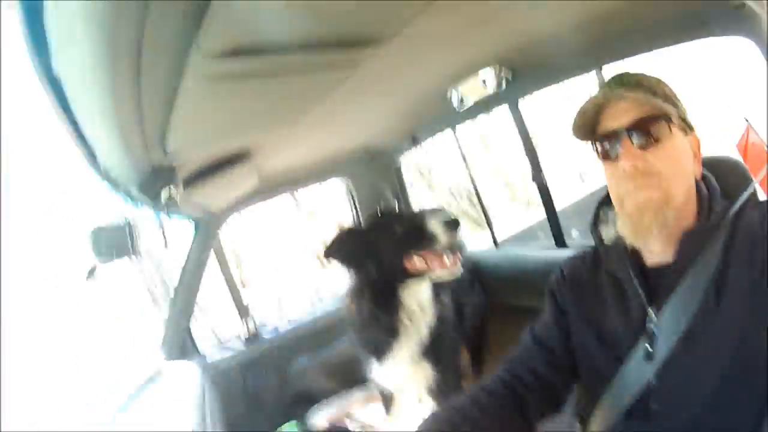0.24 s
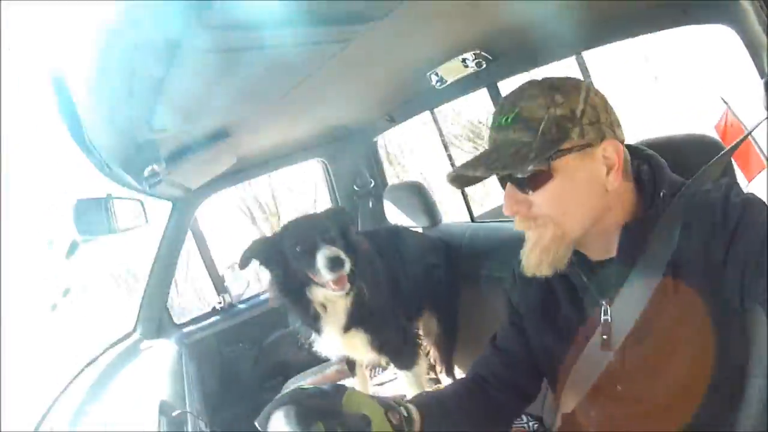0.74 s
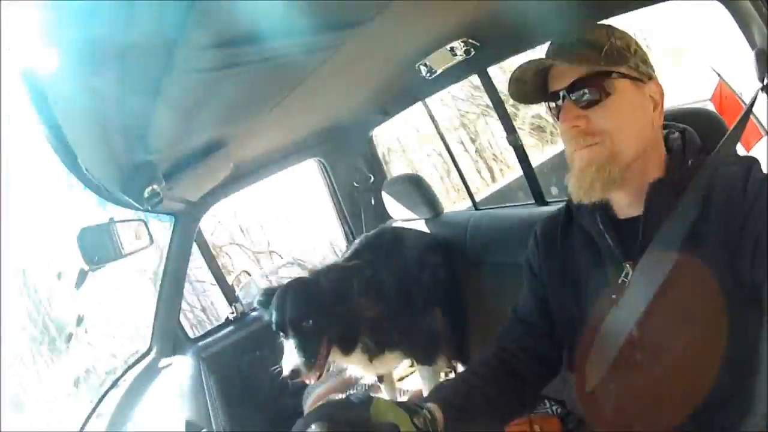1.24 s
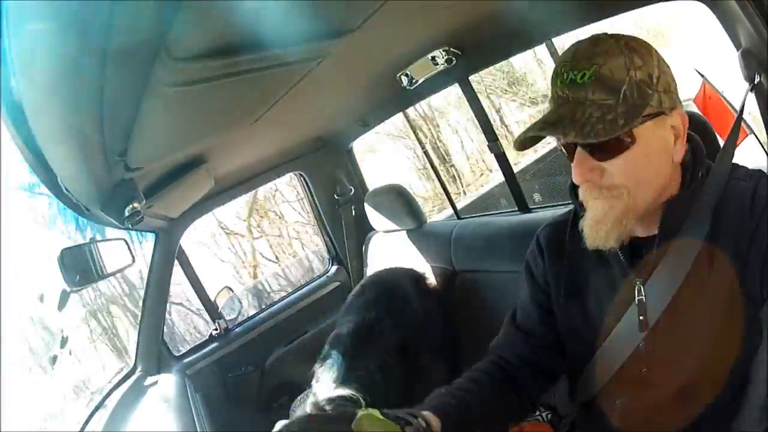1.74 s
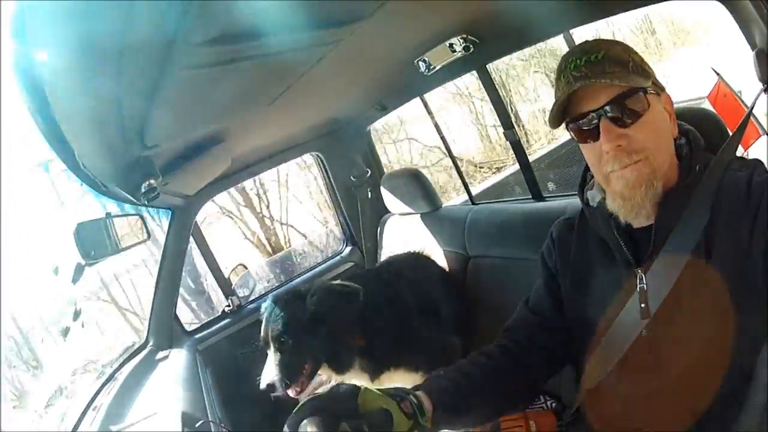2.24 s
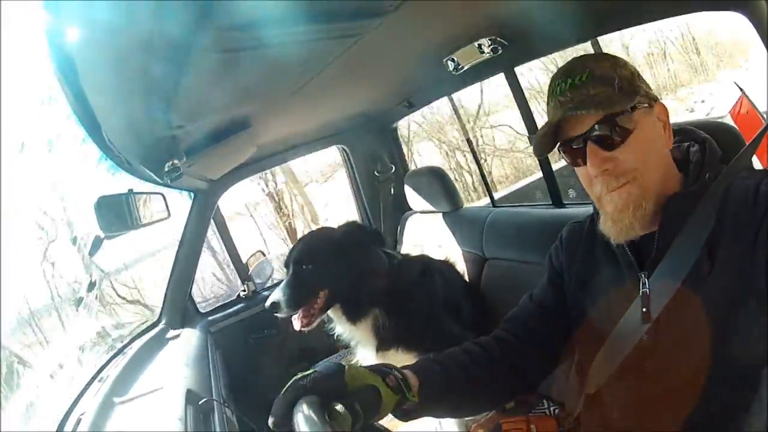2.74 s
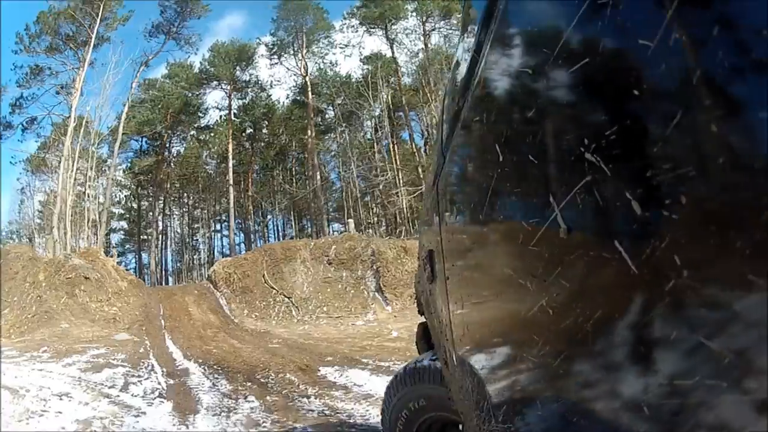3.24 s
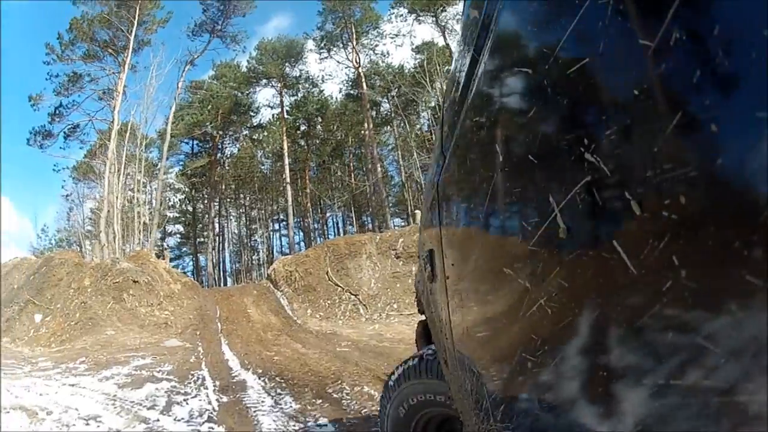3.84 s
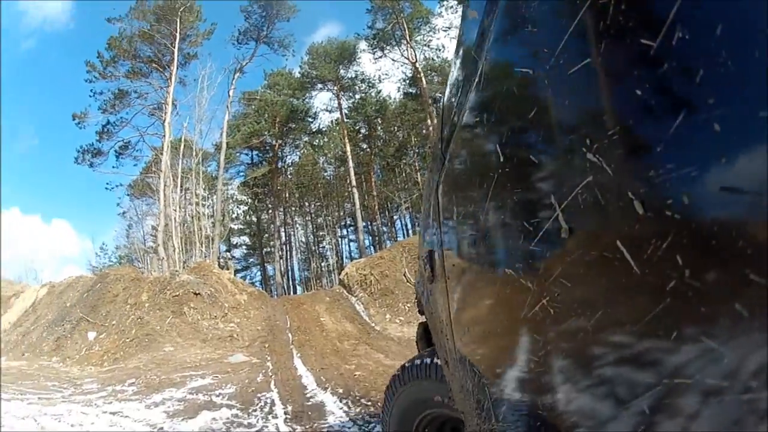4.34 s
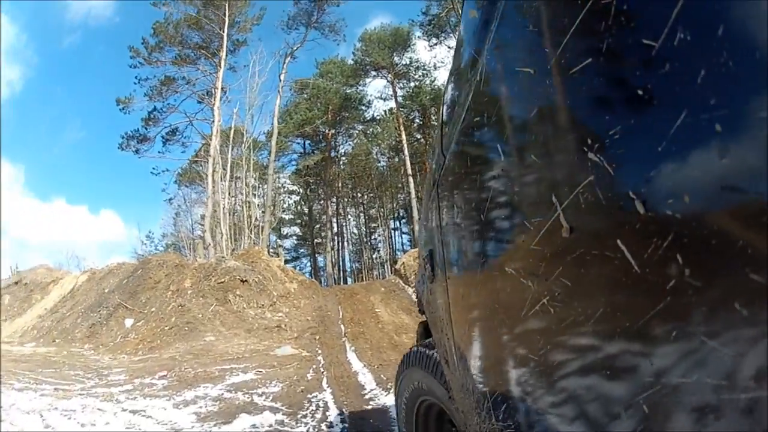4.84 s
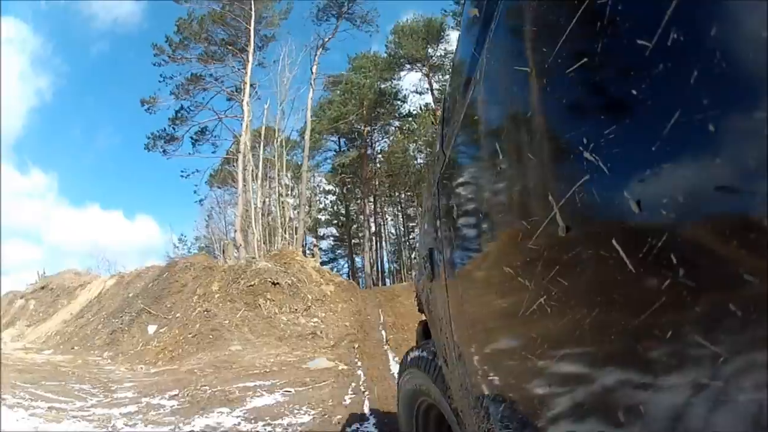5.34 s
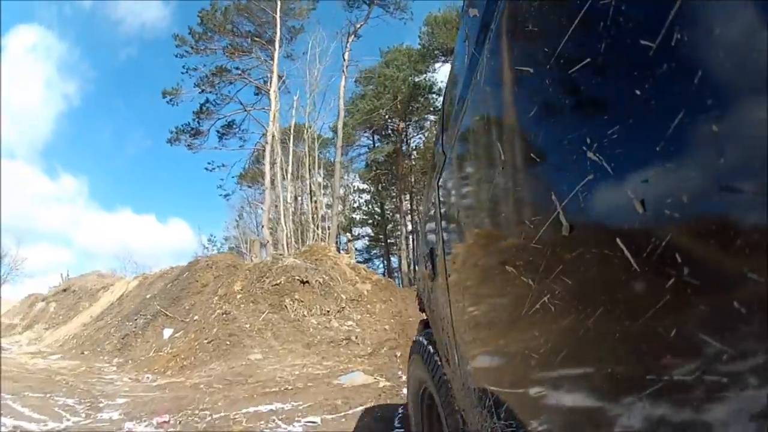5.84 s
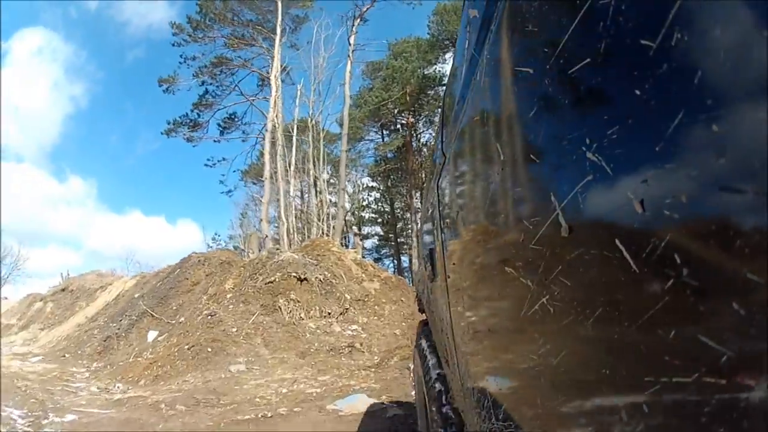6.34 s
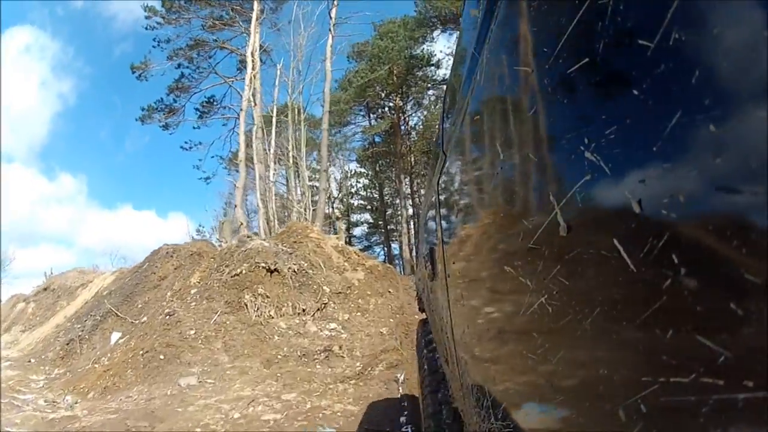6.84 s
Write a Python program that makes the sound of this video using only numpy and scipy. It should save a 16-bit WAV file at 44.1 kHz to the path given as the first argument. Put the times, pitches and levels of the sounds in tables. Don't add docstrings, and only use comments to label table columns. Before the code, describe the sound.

Loud close plastic clacks and thumps on a jolting truck for three seconds, then soft tyre rush, twig scratches and a muffled revving engine.

```python
import sys
import numpy as np
from scipy import signal
from scipy.fft import rfft, irfft, next_fast_len
from scipy.io import wavfile
from scipy.ndimage import map_coordinates

SR = 44100
rng = np.random.default_rng(int(sys.argv[2]) if len(sys.argv) > 2 else 0)


def transcribe(u):
    v = np.clip(np.atleast_2d(u).T, -1, 1)
    q = np.round(v * 32767).astype(np.int16)
    wavfile.write(sys.argv[1], SR, q)


def volts(x):
    e = np.asarray(x, float) / 20
    return 10 ** e


N = 313551

# time in seconds, jolting of the cab in dB, engine drone in the body in dB.
RIDE = [(0.0, -40, -66), (0.15, -55, -33.5), (0.55, -37, -45), (0.8, -37, -77), (1.1, -46.5, -47),
        (1.44, -38, -65.5), (1.52, -38.5, -55.5), (1.6, -47, -65), (1.75, -37, -59), (2.3, -44.5, -56),
        (2.75, -48, -67.5), (3.0, -47.5, -48), (3.17, -30, -45), (3.3, -49, -46.5), (3.82, -42, -44),
        (4.39, -52.5, -50), (4.6, -59, -55.5), (5.05, -60.5, -45.5), (5.86, -83, -47.5), (6.26, -67, -52.5),
        (7.11, -63, -42)]
# resonance in Hz, width in Hz, level in dB.
CAB_AIR = [(42.05, 42.6, -1.5), (28.56, 12, -3.5), (20, 16, -10)]
# resonance in Hz, width in Hz, level in dB.
PANELS = [(65.6, 14, -2), (98, 10.7, 0), (126.5, 14.4, 1.5), (142.8, 64, -6)]
# resonance in Hz, width in Hz, level in dB.
DOOR = [(221, 20, 0)]
# resonance in Hz, width in Hz, level in dB.
ROOF = [(118, 9, 0)]
PANEL_JOLT_DB, PANEL_DRONE_DB, DOOR_DB, ROOF_DB = -10.5, 0, -11.5, -18
DOOR_FROM_S = 2.965
# peak in seconds, rise in seconds, fall in seconds, level in dB.
ROOF_SWELLS = [(0.79, 0.15, 0.24, -38), (1.09, 0.023, 0.16, -29.5), (2.47, 0.52, 0.56, -64.5),
               (3.3, 0.39, 1.1, -43.5), (4.28, 0.094, 0.32, -41.5), (4.46, 0.39, 0.12, -54.5),
               (3.72, 0.54, 0.31, -55), (5.3, 0.2, 0.3, -52), (6.71, 1, 1, -55.5)]
# peak in seconds, rise in seconds, fall in seconds, level in dB.
DOOR_SWELLS = [(3.02, 0.058, 0.22, -49), (3.6, .5, 0.35, -55), (4.3, .3, 0.31, -53),
               (5.15, .4, 0.63, -51.5), (5.78, 0.23, 0.44, -49), (6.85, 0.61, 0.41, -54.5)]
ROOF_HUM_HZ, DOOR_HUM_HZ = 120.6, 223

# time in seconds, firing rate in Hz, level in dB.
ENGINE = [(4.7, 60.37, -51), (4.82, 64.16, -45), (5.0, 86.7, -47), (5.12, 107, -41), (5.3, 107.1, -51.5),
          (5.5, 92.96, -45), (5.7, 79.7, -48.5), (5.85, 70.8, -47), (6.05, 69.8, -53), (6.4, 57.1, -62.5),
          (6.62, 62.5, -55), (6.85, 74.1, -45), (7.0, 89.4, -48), (7.11, 98, -45)]
# time in seconds, whine in Hz, level in dB.
GEAR_WHINE = [
    (6.7, 1658, -85),
    (6.82, 1660, -60),
    (7.0, 2000, -51),
    (7.11, 2000, -63),
]
# resonance in Hz, width in Hz, level in dB.
FLOOR_PAN = [(322, 36, -6)]

# time in seconds, level in dB.
TYRES = [(2.965, -51.5), (3.2, -54.5), (3.48, -55), (4.05, -52.5), (4.53, -62.5), (4.75, -60.5),
         (4.93, -54), (4.96, -52), (5.16, -47.5), (5.45, -53), (5.82, -54.5), (6.05, -58.5), (6.34, -58),
         (6.73, -55.5), (6.91, -52.5), (7.11, -50.5)]
# resonance in Hz, width in Hz, level in dB.
ROAD = [(662, 167, -0.5), (276.3, 45, 1.5), (860, 410, -42.5), (1250, 168, 1.5), (1817, 78, 8),
        (2255, 114, 5.5), (3070, 220, 0), (3360, 780, -9.5), (4850, 370, -16), (5550, 300, -13.5)]
# peak in seconds, rise in seconds, fall in seconds, level in dB.
SEAL_HISS = [
    (2.975, .02, .05, -56),
    (4.86, 0.12, 0.5, -63),
    (5.16, 0.61, 0.61, -71),
    (6.98, .6, .6, -64),
]
# resonance in Hz, width in Hz, level in dB.
SEAL = [(5560, 160, 0)]

# time in seconds, level in dB, pitch in Hz.
AXLE_BUMPS = [(1.777, -24.5, 90), (2.394, -29, 80), (1.47, -25, 110), (1.432, -28, 60), (3.21, -30, 70),
              (1.225, -37, 125)]
# peak in seconds, rise in seconds, fall in seconds, level in dB.
TWIGS = [
    (4.716, 0.0027, 0.038, -39.5),
    (4.764, 0.0029, 0.065, -32),
    (4.795, 0.021, 0.035, -44),
    (4.82, 0.036, 0.018, -42),
    (4.946, 0.009, 0.1, -39.5),
]
# resonance in Hz, width in Hz, level in dB.
DOOR_SKIN = [(1750, 94, 4.5), (2350, 320, 0.5), (3270, 440, -1), (5000, 870, -12)]
# time in seconds, level in
# dB, pitch in Hz, width in Hz.
TAPS = [(1.696, -47, 3300, 1500), (1.768, -52, 4600, 900), (1.795, -54, 3200, 1200),
        (2.261, -47, 3200, 500), (2.732, -49, 3400, 800), (2.78, -44.5, 2230, 270), (2.686, -47, 2500, 300),
        (2.455, -43, 2200, 299), (4.39, -54, 2750, 500), (4.392, -52, 1700, 500), (4.41, -65, 2600, 520),
        (4.72, -53, 3900, 500), (4.765, -46, 1200, 300), (4.79, -53, 4600, 900), (4.949, -45, 1100, 400),
        (1.082, -33, 3970, 2500), (1.809, -22, 470, 300), (2.024, -17.5, 464, 300), (2.31, -20.5, 450, 340),
        (2.311, -16, 1800, 400), (0.48, -46.5, 4000, 2500), (0.585, -48, 3000, 2500),
        (3.163, -20, 1700, 900), (3.227, -53, 5700, 1500), (3, -47, 3400, 360), (2.025, -18, 1600, 700),
        (2.151, -18, 1700, 800), (1.81, -22, 1800, 900), (4.946, -44, 3500, 500), (0.762, -22, 550, 300),
        (2.312, -22, 550, 200)]
TAP_MS = 2.8

# time in seconds, truck body in dB, lid ring in dB.
THUMPS = [(0.144, -10, -22), (0.2052, -24, -27), (0.312, -11.5, -19), (0.4185, -18, -24.5),
          (0.5336, -8.5, -24.5), (0.6677, -27.5, -24.5), (0.7191, -11, -19.5), (0.7616, -33, -24.5),
          (1.0698, -11.5, -20.5), (1.2993, -8, -19), (1.3872, -29.5, -33), (1.4075, -18.5, -28),
          (1.4526, -59, -28.5), (1.77, -45, -70), (1.807, -23, -20), (2.023, -20.5, -28),
          (2.1486, -23, -29), (2.3105, -19, -30.5), (2.39, -55, -67), (2.425, -35, -23.5),
          (3.1386, -14, -28.5), (3.1607, -45, -32), (0.0, -28.5, -33.5)]
# resonance in Hz, width in Hz, level in dB.
THUD = [(46, 26, 18.5), (65.5, 91, 19.5), (111.1, 2.7, 14), (137, 180, 5.5)]
# note in Hz, width in Hz.
LID_NOTES = [(656, 19), (666, 26), (650, 49), (650, 22), (669, 37), (637, 51), (657, 36), (633, 27),
             (657, 21), (650, 20), (617, 18), (630, 22), (629, 18.7), (635, 17), (633, 33), (635, 11),
             (635, 14), (630, 17), (635, 17), (657, 17), (640, 27), (660, 22), (640, 14.5)]
# resonance in Hz, width in Hz, level in dB.
LID_UPPER = [(735, 30, -20)]
# time in seconds, level in dB.
BOTTOMS = [(1.3004, -12), (1.8088, -20.5), (2.025, -15), (2.15, -18.5), (2.3104, -21.5)]
# resonance in Hz, width in Hz, level in dB.
STEM = [(313, 140, 0)]

# peak in seconds, rise in seconds, fall in seconds, level in dB, pitch in Hz.
SQUEAKS = [(0.122, 0.0089, 0.011, -31, 1880), (0.132, 0.014, 0.0048, -22, 2106),
           (0.471, .008, .008, -25, 1900), (0.4832, 0.01, 0.0026, -13.5, 1860),
           (0.4903, 0.0052, 0.0036, -15, 2000), (0.495, 0.0055, 0.004, -13, 1884),
           (0.5055, 0.0075, 0.003, -1.5, 1850), (0.514, 0.0085, 0.0025, -13, 1870),
           (0.525, 0.019, 0.0077, -17, 1680), (0.941, 0.0075, 0.0053, -19.5, 1250),
           (1.167, 0.0068, 0.014, -29, 1820), (1.183, 0.0051, 0.0038, -20.5, 1330),
           (1.19, 0.0046, 0.013, -20.5, 1330), (2.203, 0.0072, 0.0043, -30, 1950),
           (3, 0.011, 0.018, -27.5, 1776)]
SQUEAK_WIDTH_HZ = 150

# peak in seconds,
# rise in seconds, fall in seconds, shell in dB, cavity over shell in dB.
SCRAPES = [(0.004, 0.034, 0.0097, -36, 12), (0.115, 0.13, 0.33, -39, 1), (0.309, 0.03, 0.16, -38.5, 2.5),
           (0.41, 0.0063, 0.02, -30.5, -18), (0.474, 0.017, 0.54, -53, 2), (0.528, 0.12, 0.01, -30.5, 5),
           (0.624, 0.031, 0.28, -41.5, 3), (0.79, 0.034, 0.12, -49.5, 2), (0.958, 0.03, 0.055, -31, -6.5),
           (1.191, 0.16, 0.11, -35, -2.5), (1.297, 0.062, 0.07, -42.5, -5),
           (1.487, 0.081, 0.062, -38.5, -11), (1.57, 0.17, 0.034, -43.5, 2.5),
           (1.748, 0.1, 0.042, -41.5, 6), (1.826, 0.056, 0.21, -52.5, 3.5), (2.06, 0.089, 0.21, -58, -6),
           (2.201, 0.039, 0.042, -39.5, 6), (2.345, 0.033, 0.028, -51, -8), (2.377, 0.075, 0.0058, -49, 3),
           (2.454, 0.073, 0.65, -55, -9), (2.57, 0.32, 0.0089, -48.5, 0), (2.684, 0.083, 0.43, -53.5, 3),
           (3.003, 0.032, 0.27, -48, 8.5), (3.121, 0.077, 0.1, -43, -11), (3.19, 0.093, 0.031, -47.5, 8.5),
           (3.87, 0.037, 0.25, -66.5, 16), (4.265, 0.043, 0.072, -57.5, 10), (4.5, 0.17, 0.18, -66.5, 6),
          (4.58, 0.0071, 0.04, -59.5, 10.5), (4.73, 0.045, 0.33, -61.5, 12),
          (1.05, 0.028, 0.031, -50.5, -7), (2.45, 0.031, 0.039, -53, -17)]
# resonance in Hz, width in Hz, level in dB.
HOLLOW = [(343, 350, -15), (670, 33, 6), (800, 148, -5), (1058, 21, 6)]
# resonance in Hz, width in Hz, level in dB.
RUB_BRIGHT = [(4400, 700, -11)]
# centre in Hz, width in Hz, level in dB.
RUB_AIR = [(2850, 500, 0), (5200, 1500, 0)]
RUB_TOP_HZ, RUB_AIR_DB, AIR_GROWS = 5030, -4, 1.3
SCRAPE_CLICK_DB, CLICK_GROWS = 2, 1.245
WANDER_DB = 3

# resonance in Hz, width in Hz, level in dB.
SHELL = [(1221, 120, -1), (1827, 393, 5.5), (2000, 446, 8), (2276, 369, -0.5)]
# resonance in Hz, width in Hz, level in dB.
CLICK = [(2900, 640, -23), (3506, 285, 0), (4157, 240, -6.5), (4700, 430, -15.5)]
# multiple of the blow's cavity pitch, width as a share of it, level in dB.
CAVITY = [(0.45, 0.46, -9.5), (1.029, 0.24, 8)]
# centre in Hz, width in Hz, level in dB.
CRACK = [(1500, 1510, 1), (2920, 2500, -5)]
CRACK_DB, CRACK_CAVITY = -18.5, 0.42
# resonance in Hz, width in Hz, level in dB.
LENS_RING = [(5230, 1100, 0)]
LENS_RING_DB = -12
# time in seconds, shell in dB, cavity over shell in dB, cavity pitch in Hz, click over shell in dB.
BLOWS = [(0.145, -8.5, 3.5, 860, -42.5), (0.2052, -8.5, -15, 736, -20), (0.3127, -7.5, 13.5, 1040, -8),
         (0.3253, -18.5, 3.5, 804, -19.5), (0.3447, -33.5, 12, 860, -3.5), (0.4191, -22.5, 2.5, 700, -11.5),
         (0.5331, 2.5, -7, 925, -19.5), (0.6672, 1.5, -22.5, 1046, -19), (0.7195, -12, 2, 814, -19.5),
         (0.762, -7, -9.5, 860, -14.5), (1.069, -10, 2, 770, -14.5), (1.2978, 2, -10.5, 613, -3),
         (1.32, -18, -5.5, 775, -14), (1.3884, -13, -5, 695, -6), (1.4081, -8.5, -7.5, 1030, -18.5),
         (1.452, -12.5, -4, 626, -4.5), (1.7095, -37, 30, 760, 6.5), (1.808, -15.5, 5, 800, -2),
         (2.0244, -15.5, 10, 795, -1), (2.1503, -13, 5, 714, -3.5), (2.3101, -16, 14.5, 908, 2.5),
         (2.424, -19, 2.5, 740, -8), (3.139, -5, -8.5, 740, -20), (3.162, -9.5, -17.5, 800, -18.5)]
BLOW_MS, SOFTER_LONGER = 1, 0.24
# flank in Hz, flank in dB, shell in Hz, click in Hz.
SPOTS = [(1054, 8, 1820, 1800), (1330, -6, 2000, 3430), (1520, -0.5, 1800, 3300), (1330, 1, 1900, 2700),
         (1280, 4, 2700, 6100), (1320, 12, 2000, 3900), (1060, -6, 1700, 5600), (1340, -1.5, 1900, 1100),
         (1040, 15.5, 1970, 3100), (1400, 2, 1840, 3500), (1030, -2, 1860, 3430), (1100, -1, 1900, 2100),
         (1270, 2, 1950, 3800), (1490, 0.5, 1500, 3500), (1330, 4.5, 1930, 7700), (1450, 1.5, 1760, 3660),
         (1100, -11, 1000, 3360), (1000, -1, 1630, 3800), (1010, -3, 1400, 3850), (1020, 6.5, 1800, 3850),
         (1000, -9, 3800, 3750), (1090, 3, 1580, 4000), (1500, -9, 1900, 6500), (1330, 0, 1900, 3900)]
# flank in Hz, flank in dB, shell in Hz, click in Hz.
USUAL_SPOT = (1284, -1, 1900, 3427)
# time in seconds, shell in dB, click over shell in dB, contact in milliseconds.
RAPS = [(0.0088, -21.5, -21, 1.2), (0.056, -27, -33, 0.48), (0.23, -28.5, -37, 0.35),
        (0.3694, -15.5, -21, 1.7), (0.4362, -26.5, -8, 1.4), (0.469, -32, -1.5, 1.9),
        (0.479, -33.5, 6.5, 2.7), (0.488, -21.5, -1.5, 7.2), (0.5015, -17, -11.5, 1.8), (0.52, -35, 5, 2.5),
        (0.9218, -19, -3.5, 0.34), (0.936, -35, 5.5, 2.8), (0.951, -19, -9.5, 1.8), (1.1096, -32.5, -2, 1),
        (1.2058, -30.5, -13, 1.5), (1.279, -26, -6, 0.34), (1.4438, -26.5, -3.5, 0.37),
        (1.5569, -33, -3, 6.9), (1.5666, -28, -1.5, 1.7), (1.8912, -36.5, -17, 1.8),
        (3.0415, -21, -14, 1.8), (3.205, -29.5, -26, 1.3), (3.864, -43, -30, 11), (4.577, -58, -40, 2.5),
        (4.7145, -46.5, -2.5, 5.9), (5.143, -36, -5, 1.8)]
RAP_CAVITY_DB, RAP_CAVITY_HZ = -19.5, 1100
# time in seconds, shell in dB, cavity over shell in dB.
TICKS = [(0.173, -37, 3), (0.554, -43, -15), (0.6268, -43, 5), (0.655, -43, 14), (0.6777, -32.5, 10),
         (0.746, -36, -22), (0.795, -42.5, -5), (1.3416, -39.5, 7.5), (1.4285, -39, -11),
         (1.4753, -32.5, -14.5), (1.7402, -46, 10), (2.0085, -31.5, -17.5), (1.6935, -52.5, -11),
         (2.05, -42, 4), (2.0822, -56, 14), (2.2003, -46, 18), (2.21, -31.5, -2), (2.22, -34, 2),
         (2.261, -42.5, -10), (2.593, -50.5, -16), (2.668, -35.5, -29), (2.677, -37, -30),
         (2.78, -49.5, -1), (3.0255, -36, -23), (3.1744, -35, 1), (3.2152, -40, 1), (4.262, -68, 18),
         (4.385, -52, -6)]
TICK_CAVITY_HZ, TICK_CLICK_DB, TICK_MS = 740, 1.5, 1.5
# time in seconds, level in dB.
SNAPS = [(0.156, -31), (0.18, -37), (0.186, -45), (0.226, -43.5), (0.735, -37.5), (0.739, -35.5),
         (0.779, -50), (0.945, -35), (1.349, -40), (1.419, -35), (1.506, -42), (1.575, -43), (2.019, -31),
         (2.058, -50), (3.133, -37), (3.182, -53)]
LOW_NOTE_CUT_DB = -1
KICK, CLICK_SHORTER = 1.62, 0.81

HOLD_UP, HOLD_DOWN, HOLD = 40, 147, 4
HISS_DB = -75


def unit(x):
    return x / np.sqrt(np.mean(x ** 2) + 1e-20)


def curves(rows, off_db=None):
    s, *cols = np.transpose(rows)
    return [np.interp(np.arange(N) / SR, s, c, off_db, off_db) for c in cols]


def wobble(rate):
    knots = rng.standard_normal(int(N * rate / SR) + 4)
    return map_coordinates(knots, [np.arange(N) * rate / SR])


def ring(x, modes):
    n = x.shape[-1]
    m = next_fast_len(n + min(n, SR // 4))
    f = np.fft.rfftfreq(m, 1 / SR)
    body = 0
    for k, (hz, width, db) in enumerate(modes):
        damping = 1j * f * width
        body = body + (-1) ** k * volts(db) * damping / (hz * hz - f * f + damping)
    return irfft(rfft(x, m) * body, m)[..., :n]


def ring_twice(x, modes):
    return ring(ring(x, modes), modes)


def retune(modes, share):
    return [(hz * share, width, db) for hz, width, db in modes]


def grit(rough_db, rate):
    return unit(volts(rough_db * wobble(rate)) * rng.standard_normal(N))


def strokes(rows, extra_db=0):
    t = np.arange(0, N, 8) / SR
    gain = 0
    for (s, rise, fall, db), more in zip(rows, extra_db + np.zeros(len(rows))):
        gain = gain + volts(db + more - 20 * np.maximum((s - t) / rise, (t - s) / fall))
    return np.interp(np.arange(N) / SR, t, gain)


def strike(s, db, force, modes):
    rung = ring(force, modes)
    sound = volts(db) * rung / np.sqrt(np.mean(rung[:, :300] ** 2, axis=1, keepdims=True))
    where = np.round(s * SR).astype(int) + np.arange(force.shape[1])
    return np.bincount(where.ravel(), sound.ravel(), N + SR)[:N]


def hum(hz):
    waver = 1 + .009 * wobble(6)
    return volts(3 + 2.2 * wobble(9)) * np.sin(2 * np.pi * np.cumsum(hz * waver) / SR)


def boom(modes):
    return unit(ring_twice(rng.standard_normal(N), modes))


def cab_shake():
    jolt, drone = volts(curves(RIDE))
    door_heard = np.arange(N) > DOOR_FROM_S * SR
    air = jolt * boom(CAB_AIR)
    panels = (volts(PANEL_JOLT_DB) * jolt + volts(PANEL_DRONE_DB) * drone) * boom(PANELS)
    roof = volts(ROOF_DB) * drone * boom(ROOF) + strokes(ROOF_SWELLS) * hum(ROOF_HUM_HZ)
    door = volts(DOOR_DB) * drone * door_heard * boom(DOOR) + strokes(DOOR_SWELLS) * hum(DOOR_HUM_HZ)
    return air + panels + roof + door


def engine():
    hz, db = curves(ENGINE)[0], curves(ENGINE, off_db=-120)[1]
    turn = 2 * np.pi * np.cumsum(hz) / SR

    def order(k):
        return volts(db + 1.5 * wobble(4)) * np.sin(k * turn)

    door = volts(-3) * ring_twice(order(2) + order(3), [(224, 30, 0)])
    slowing = np.gradient(hz) < 0
    floor = ring_twice((order(3) + order(7 / 2) + order(4)) * slowing, FLOOR_PAN)
    whine_hz, whine_db = curves(GEAR_WHINE)
    whine = volts(whine_db + 2.5 * wobble(23)) * np.sin(2 * np.pi * np.cumsum(whine_hz) / SR)
    return order(1) + door + floor + whine


def tyres():
    rush = grit(rough_db=1.13, rate=21)
    low = volts(.8 * wobble(9)) * ring(rush, ROAD[:4])
    high = volts(.8 * wobble(9)) * ring(rush, ROAD[4:])
    seal = strokes(SEAL_HISS) * unit(ring_twice(grit(rough_db=3, rate=30), SEAL))
    return volts(curves(TYRES, off_db=-120)[0] + 5.5) * unit(low + high) + seal


def axle_bumps():
    clock = np.arange(N) / SR
    sound = np.zeros(N)
    for s, db, hz in AXLE_BUMPS:
        t = clock - s
        sound += volts(db) * np.exp(-(t * hz) ** 2) * np.cos(2 * np.pi * hz * t)
    return sound


def twigs():
    return strokes(TWIGS) * unit(ring_twice(grit(rough_db=0.0, rate=360), DOOR_SKIN))


def taps():
    s, db, hz, width = np.transpose(TAPS)[..., None]
    t = np.arange(SR // 20) / SR
    band = [(hz, width, 0)]
    burst = rng.standard_normal((len(s), len(t))) * np.exp(-t / (TAP_MS / 1000))
    return strike(s, db, ring(burst, band), band)


def jolts():
    s, body_db, lid_db = np.transpose(THUMPS)[..., None]
    end_s, end_db = np.transpose(BOTTOMS)[..., None]
    lid = [(*np.transpose(LID_NOTES)[..., None], 0)] + LID_UPPER
    t = np.arange(SR // 3)[None] / SR

    def push(span):
        return np.exp(-((t - .0016) / span) ** 2)

    stem = strike(end_s, end_db, push(0.0003), STEM)
    thud = strike(s, body_db - 4.5, push(0.00074), THUD)
    return stem + thud + strike(s, lid_db - 0.5, push(0.000094), lid)


def squeaks():
    s, rise, fall, db, hz = np.transpose(SQUEAKS)[..., None]
    t = np.arange(SR // 10) / SR - .05
    tone = ring(rng.standard_normal((len(s), len(t))), [(hz, SQUEAK_WIDTH_HZ, 0)])
    tone = tone / np.abs(signal.hilbert(tone)) ** .5
    swell = volts(db - 20 * np.maximum(-t / rise, t / fall))
    sound = tone / tone.std(axis=1, keepdims=True) * swell
    sound = ring(sound, [(hz, 700, 0), (3600, 400, -14)])
    where = np.round((s + t) * SR).astype(int)
    return np.bincount(where.ravel(), sound.ravel(), N)


def rubbing():
    scrape = grit(rough_db=3, rate=130)
    rows = np.array(SCRAPES)
    rub = strokes(rows[:, :-1])
    cavity_rub = strokes(rows[:, :-1], rows[:, -1])

    def part(modes):
        spots = [volts(WANDER_DB * wobble(20.91)) * ring(scrape, retune(modes, share)) for share in (.93, 1.06)]
        return unit(sum(spots))

    shell = rub * (part(SHELL[1:]) + part(SHELL[:1]))
    click = volts(SCRAPE_CLICK_DB) * rub ** CLICK_GROWS * part(CLICK + RUB_BRIGHT)
    sound = shell - click + cavity_rub * part(HOLLOW)
    air = volts(RUB_AIR_DB) * rub ** AIR_GROWS * unit(ring(scrape, RUB_AIR))
    return signal.sosfilt(signal.butter(5, RUB_TOP_HZ, fs=SR, output="sos"), sound) + air


def contacts():
    blows = [(*row, BLOW_MS * volts(-SOFTER_LONGER * row[1])) for row in BLOWS]
    raps = [(s, db, RAP_CAVITY_DB, RAP_CAVITY_HZ, click_db, ms) for s, db, click_db, ms in RAPS]
    ticks = [(*row, TICK_CAVITY_HZ, TICK_CLICK_DB, TICK_MS) for row in TICKS]
    snaps = [(s, db - 11.0, -10, TICK_CAVITY_HZ, 14, TICK_MS) for s, db in SNAPS]
    return blows + raps + ticks + snaps


def knocks():
    rows = contacts()
    s, db, cavity_db, cavity_hz, click_db, ms = np.transpose(rows)[..., None]
    spots = SPOTS + [USUAL_SPOT] * (len(rows) - len(SPOTS))
    flank_hz, flank_db, shell_hz, click_hz = np.transpose(spots)[..., None]
    light = slice(len(BLOWS) + len(RAPS), None)

    t = np.arange(SR // 14) / SR
    blow = np.exp(-t / (1.72 * np.maximum(ms, .4) / 1000)) * (1 - np.exp(-t / 0.000067))
    shell_noise, click_noise = rng.standard_normal((2, len(s), len(t)))
    ragged = shell_noise * blow
    kick = KICK * np.exp(-((t - .0006) / .00009) ** 2) / np.maximum(ms, 1)
    push = np.exp(-((t - .0012) / 0.00017) ** 2)

    walls = [(flank_hz, SHELL[0][1], flank_db)] + retune(SHELL[1:], shell_hz / USUAL_SPOT[2])
    edges = CLICK[:1] + retune(CLICK[1:], click_hz / USUAL_SPOT[3])
    cavity = []
    for share, width, level in CAVITY:
        cavity_width = cavity_hz * width * 1.5 / np.maximum(ms, .8)
        cavity.append((cavity_hz * share, cavity_width, level - LOW_NOTE_CUT_DB * ms * (share < 1)))

    crack_db = db + CRACK_CAVITY * np.maximum(cavity_db, 0) + CRACK_DB
    lens_db = (db + click_db)[light] + LENS_RING_DB
    sound = strike(s, db - 3.0, ragged + kick, walls)
    sound += strike(s, db + click_db - 3.5, click_noise * blow ** (1 / CLICK_SHORTER), edges)
    sound += strike(s, db + cavity_db - 3.5, push + 0.82 * ragged, cavity)
    sound += strike(s, crack_db, click_noise * blow + kick, CRACK)
    return sound + strike(s[light], lens_db, ring(ragged[light], LENS_RING), LENS_RING)


def scene():
    background = cab_shake() + engine() + tyres()
    passing = axle_bumps() + twigs() + taps()
    housing = jolts() + squeaks() + rubbing() + knocks()
    return (background + passing + housing)[None]


def roll_off(x):
    return signal.sosfilt(signal.butter(12, 16340, fs=SR, output="sos"), x)


def record(dry):
    coarse = np.clip(signal.resample_poly(dry[0], HOLD_UP, HOLD_DOWN), -.98, .98)
    coarse = coarse + volts(HISS_DB) * rng.standard_normal(len(coarse))
    held = signal.resample_poly(np.repeat(coarse, HOLD), HOLD_DOWN, HOLD_UP * HOLD)
    held = signal.sosfiltfilt(signal.butter(12, 15400, fs=SR, output="sos"), held)
    return roll_off(np.clip(held[None, :N], -1, 1))


dry = scene()
out = record(dry)
transcribe(out)
```